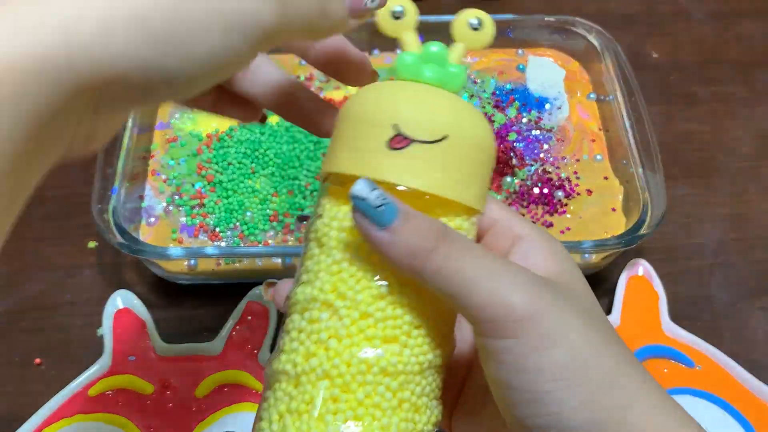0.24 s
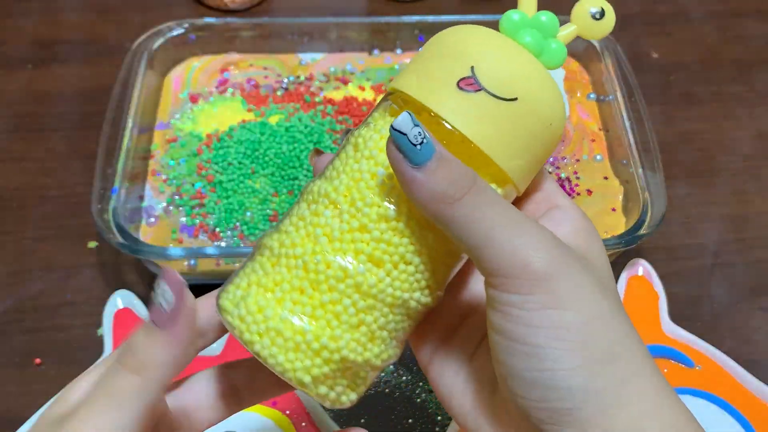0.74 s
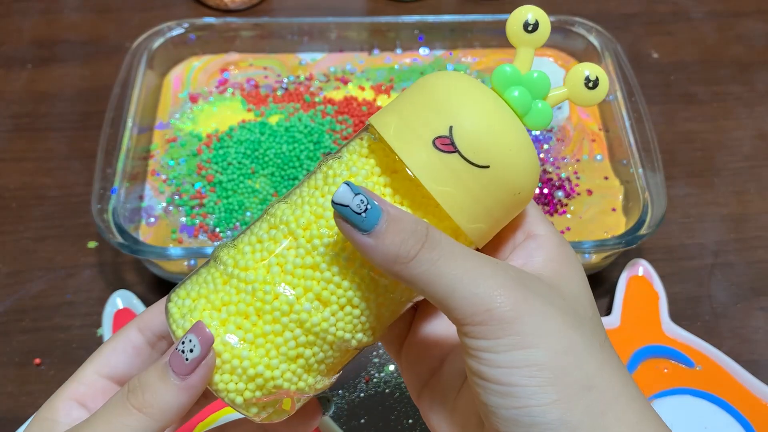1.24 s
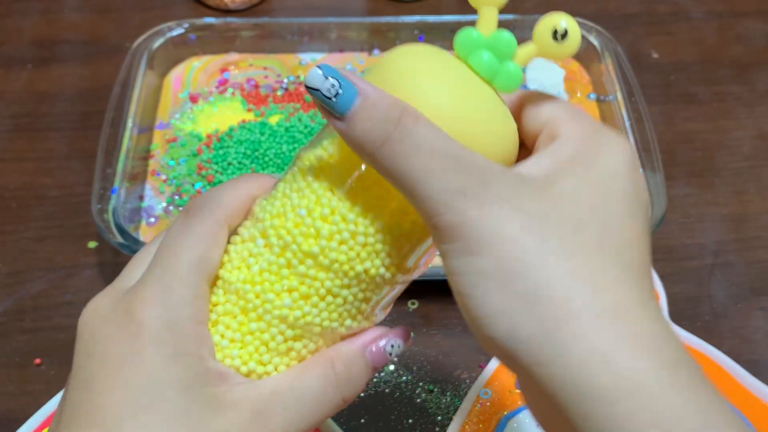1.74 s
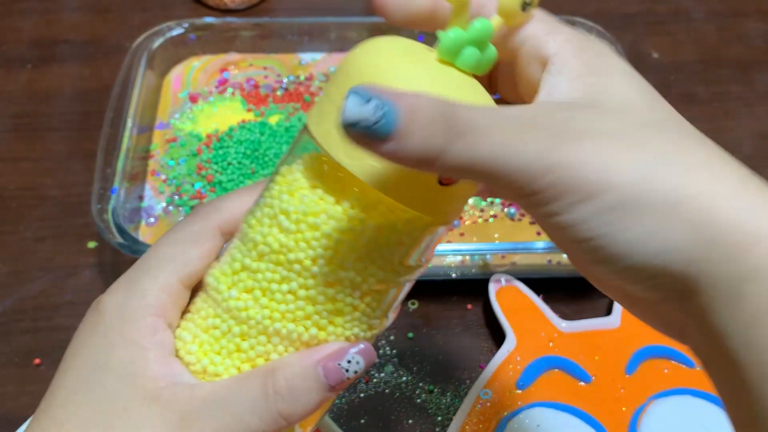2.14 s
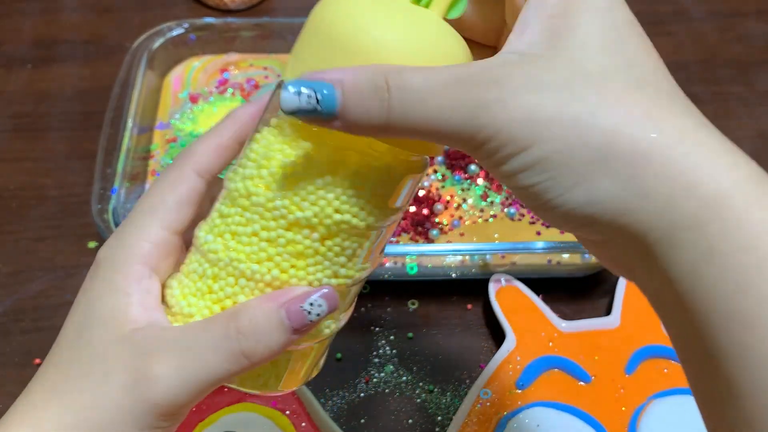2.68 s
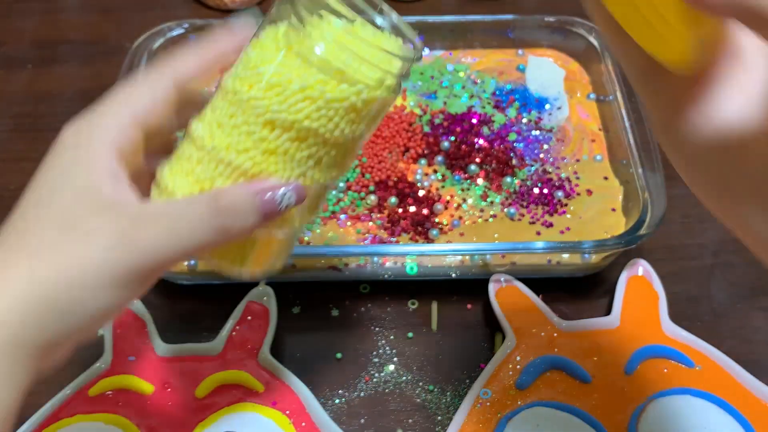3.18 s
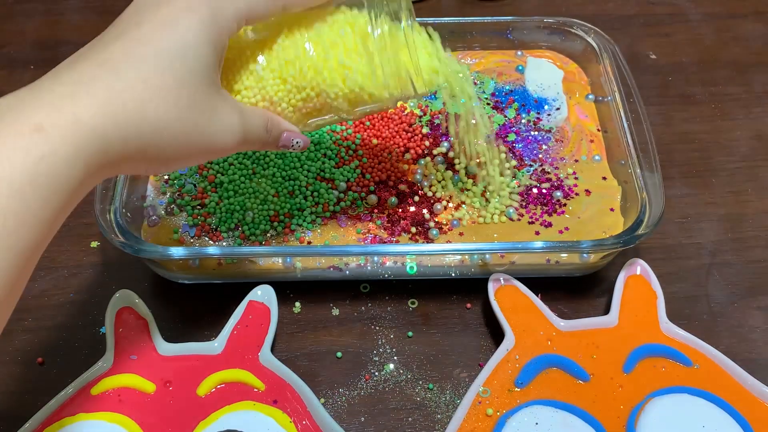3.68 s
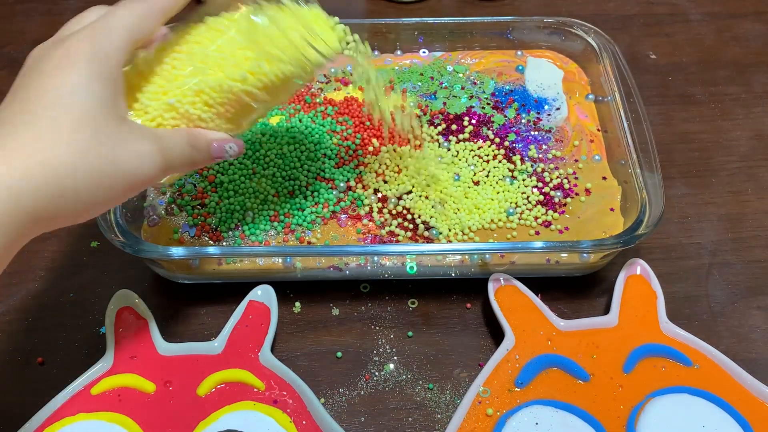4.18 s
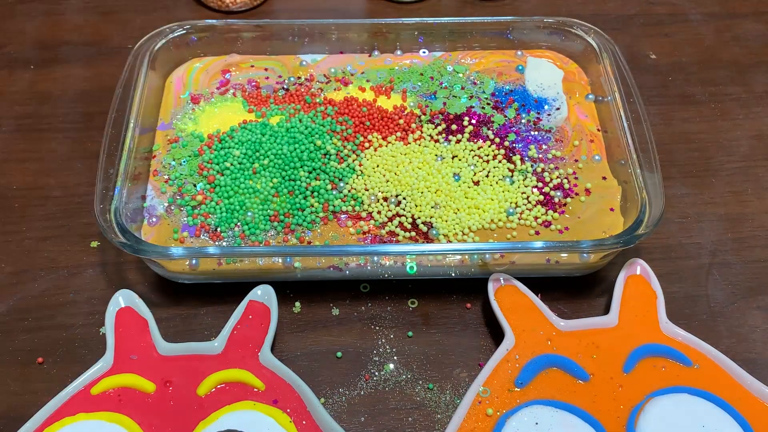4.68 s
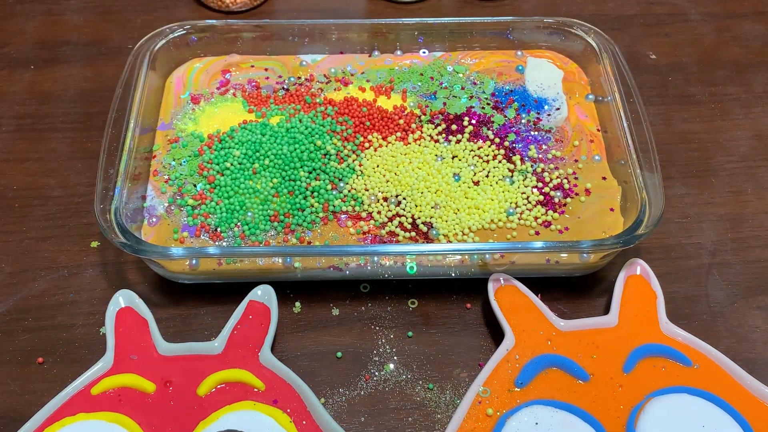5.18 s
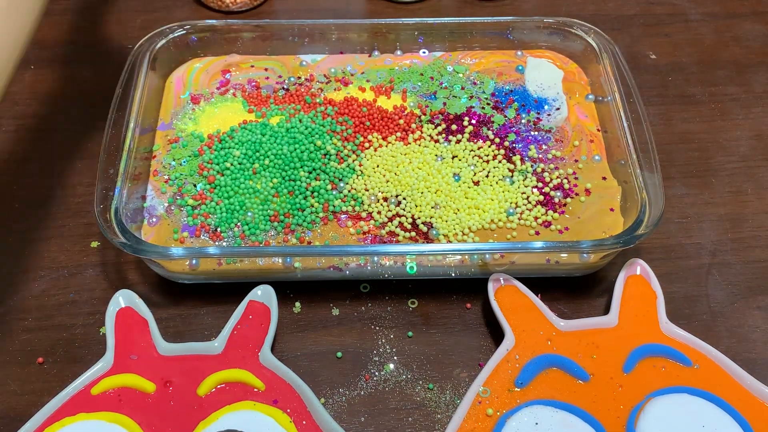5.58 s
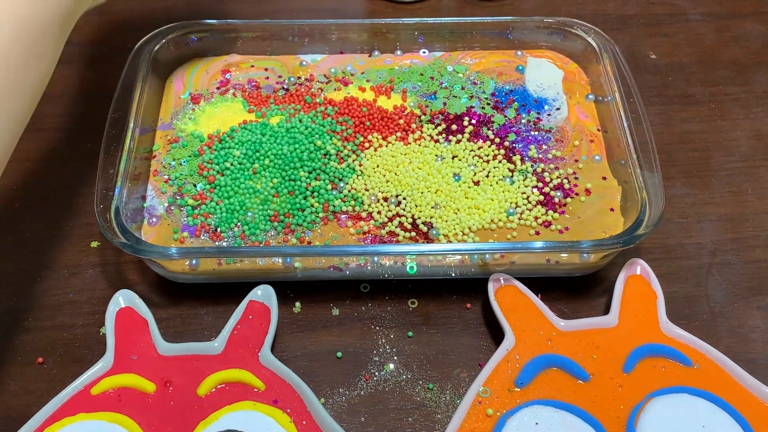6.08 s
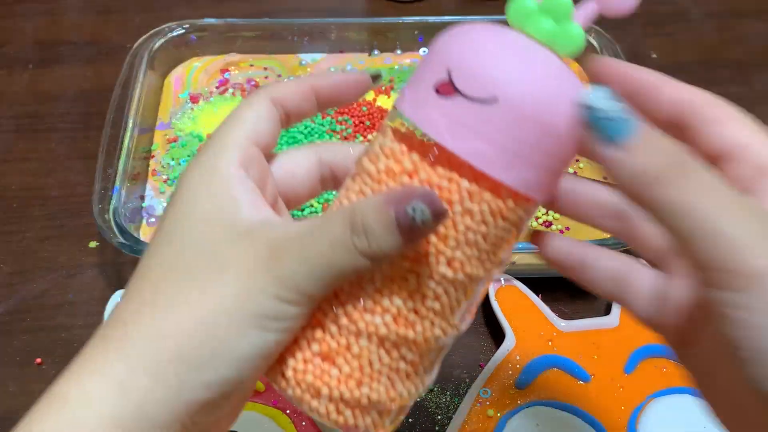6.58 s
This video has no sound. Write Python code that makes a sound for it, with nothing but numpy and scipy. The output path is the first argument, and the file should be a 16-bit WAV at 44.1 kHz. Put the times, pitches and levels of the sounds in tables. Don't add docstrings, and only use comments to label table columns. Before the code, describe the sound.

A thin plastic jar of foam beads is brushed and twisted open with squeaky clicks and a pop, beads patter out, a lid clatters on a table.

```python
import sys
import numpy as np
from scipy import signal
from scipy.fft import rfft, irfft, next_fast_len
from scipy.io import wavfile
from scipy.ndimage import uniform_filter1d, map_coordinates

SR = 44100
rng = np.random.default_rng(int(sys.argv[2]) if len(sys.argv) > 2 else 0)


def undo_db(level):
    steps = np.asarray(level, float) / 20
    return 10 ** steps


def unload_wav(signal):
    wavfile.write(
        sys.argv[1],
        SR,
        np.round(np.clip(np.atleast_2d(signal).T, -1, 1) * 32767).astype(np.int16),
    )


N = 301203

# freq_hz, level_db_per_hz
HUM_SPECTRUM = [(15, -84), (25, -35), (43, -14), (70, -13), (108, 0.5), (150, -18.5), (330, -22),
                (483, -27), (651, -29), (902, -33.5), (2150, -36), (4240, -38.5), (9330, -43), (15200, -36),
                (16500, -59)]
# freq_hz, likeness
DIFFUSE_LIKENESS = [(60, 0.94), (130, 0.95), (290, 0.86), (640, 0.29), (1410, 0.14), (3100, -0.24),
                    (6820, 0.0066), (15000, 0.11)]
# freq_hz, t60_s
ROOM_DECAY = [(150, 0.34), (500, 0.62), (2000, 0.68), (6000, 0.56), (14000, 0.6)]

# peak_s, rustle_db, rise_s, fall_s, brightness_db
BRUSHES = [(0.012, -60.5, 0.34, 0.15, -2), (0.318, -66.5, 0.012, 0.16, 7), (1.72, -65.5, 0.076, 0.18, 1.5),
           (1.81, -59, 0.0078, 0.043, -14), (1.979, -59.5, 0.057, 0.092, 3.5),
           (2.413, -56, 0.015, 0.0064, 19), (4.828, -71.5, 0.027, 0.1, 4.5),
           (4.918, -63.5, 0.063, 0.26, -14), (5.7, -59, 0.03, 0.35, -4), (5.76, -67, 0.096, 0.11, -8),
           (5.83, -67, 0.14, 0.044, -19), (6.062, -65, 0.016, 0.23, 6.5), (6.43, -68.5, 0.12, 0.19, -10),
           (6.55, -69, 0.21, 0.075, -1), (6.74, -74.5, 0.18, 0.41, -2.5)]
# freq_hz, level_db_per_hz
SKIN_SPECTRUM = [(1290, -14.5), (2200, -3.5), (3600, -3), (4280, -3.5), (6500, -6), (9700, -1.5),
                 (11200, 4), (14700, -17), (16200, -1.5), (18000, -56.5)]
# freq_hz, width_hz, level_db
SQUEAK_MODE = [(4340, 750, -1)]
# freq_hz, level_db_per_hz
SCUFF_SPECTRUM = [(320, -40), (550, -10), (860, -10), (1010, -3.5), (1120, -9), (1760, -6.5), (2350, -9.5),
                  (2900, -29), (6600, -120)]
# start_s, peak_db, start_hz, length_s
SWIPES = [(0.19, -35.5, 74, 0.024), (0.203, -31.5, 130, 0.028), (0.231, -37, 119, 0.032),
          (0.264, -38, 120, 0.055), (1.745, -49, 166, .04), (2.012, -52, 121, .035),
          (2.313, -57, 98.2, 0.028), (2.487, -42, 116, 0.029), (2.93, -59, 130, .045),
          (3.632, -46.5, 81, .025), (3.649, -36.5, 140.3, 0.034), (3.674, -30.5, 148, 0.036),
          (3.715, -34, 115.3, 0.02), (3.893, -37, 149, 0.046), (3.936, -37, 130, 0.018),
          (3.955, -33.5, 130, 0.042), (3.998, -40, 110, 0.041), (4.054, -32.5, 153, 0.059),
          (4.154, -39, 104, 0.018), (6.128, -44.5, 245, 0.049), (6.205, -48, 130, 0.026),
          (6.63, -49, 120, .013), (6.647, -44.5, 546, 0.0071), (6.648, -23, 234, 0.059)]

# start_s, click_peak_db, wall_rel_db, left_right_db, burst_ms
TOUCHES = [(0.3166, -54.5, -9, 12.5, 1.5), (1.8028, -31.5, -7, 4.5, 1.4), (2.045, -46, -4.5, 2, 2.8),
           (3.495, -46, -16, 2.5, 0.7), (3.538, -52, -32, 4, 1.1), (4.893, -47, -7, 4, 2),
           (5.839, -63, 13, 10, 4.3), (6.0267, -64.5, 0, 0.5, 4), (6.09, -53, 6, -0.5, 9.6),
           (6.109, -48, 10, 3, 11.5), (6.1253, -51, -28, -5, 5), (6.136, -47, 0, 0, 3.3)]
# freq_hz, level_db_per_hz
CLICK_SPECTRUM = [(1500, -22.5), (2300, -23), (3200, -5.5), (4300, 2.5), (5600, -1.5), (7500, -4.5),
                  (9700, -8), (11300, -8), (14500, -12.5), (16500, -15), (18000, -61.5)]
# freq_hz, width_hz, level_db
JAR_MODES = [(130, 114, -4), (223, 115, 1.5), (378, 133, 1), (511, 159, -2)]
# freq_hz, width_hz, level_db
WALL_MODES = [(950, 2570, -7.5), (1357, 218, 7), (2256, 154, 1)]
# start_s, peak_db, left_right_db
SNAPS = [(1.8021, -31.5, -1), (2.188, -27.5, 3), (2.387, -37, -9), (2.496, -18.5, -2), (2.8644, -41, -4),
         (2.9153, -55, -1.5), (3.213, -21, 7), (3.496, -52, -3), (3.657, -30, 3), (3.821, -33.5, -4),
         (3.9853, -32, 4), (4.137, -35, -4), (4.29, -34, -4), (4.892, -55, -2), (5.092, -21, -3),
         (5.3322, -15, -2.5), (6.124, -38.5, -5), (6.1364, -43, -3)]
# start_s, peak_db, pitch_hz, t60_s, left_right_db
TAPS = [(1.802, -63, 930, 0.0089, -1), (2.865, -35, 1430, .015, 7), (2.907, -30, 1100, .015, 0),
        (2.917, -32, 1950, 0.017, 14), (3.2135, -24.5, 1224, 0.025, 13), (3.2135, -32, 4900, 0.028, 23),
        (3.656, -38.5, 428, 0.058, -8), (3.821, -39.5, 1610, 0.029, 2), (3.985, -46, 530, 0.055, -2),
        (3.985, -39.5, 1635, 0.03, 0), (4.138, -43, 540, 0.056, -2), (4.288, -49, 526, 0.071, -5),
        (4.288, -55, 2300, 0.038, 5), (2.866, -29, 250, 0.081, -2.5), (4.892, -58.5, 970, 0.016, 2),
        (5.054, -26, 903, 0.05, -18), (5.092, -20, 3460, 0.027, -2), (5.11, -25, 896, 0.079, -11),
        (5.112, -22.5, 3390, 0.04, 11), (5.121, -23, 796, 0.041, -20), (5.127, -35, 1710, 0.018, 2),
        (5.199, -29, 984, 0.082, -13), (5.21, -25, 1100, 0.043, -7), (5.333, -23.5, 698, 0.063, -11),
        (5.346, -21, 750, 0.064, -14), (5.347, -14, 2860, 0.023, 2), (5.699, -53, 2368, .02, 1),
        (5.81, -60, 2630, 0.025, 3), (5.839, -52, 2110, 0.023, 9), (6.027, -52.5, 2730, 0.014, 14),
        (2.918, -28, 286, 0.035, -2), (6.089, -40, 2180, 0.016, 12), (6.107, -39.5, 1280, 0.1, 3),
        (6.118, -42, 2060, 0.065, -4), (6.125, -66, 4150, 0.091, 2), (6.136, -40.5, 598, 0.064, 5),
        (6.17, -50.5, 1010, 0.057, 4), (3.177, -26.5, 390, 0.073, -1), (2.939, -26, 202, 0.048, -1)]
# start_s, peak_db, pitch_hz, t60_s, left_right_db
MORE_TAPS = [(2.355, -46, 229, .05, 0), (2.488, -47, 200, .04, -1), (2.527, -32, 500, 0.032, -2),
             (2.544, -28, 427, 0.053, 0), (2.554, -33, 242, 0.075, -2), (2.57, -43, 300, .03, 0),
             (2.587, -41, 328, 0.036, 0), (2.598, -45, 300, .03, 0), (2.711, -62, 300, 0.031, 0),
             (2.831, -35, 216, 0.061, -2), (2.9497, -19.5, 335, .025, -1), (3.066, -29, 307, 0.043, 0),
             (1.8024, -29, 4330, 0.014, -3), (1.803, -37, 5660, .012, -5), (2.188, -39, 318, .04, 0),
             (2.386, -24, 4000, 0.011, 0), (3.155, -29, 347, 0.09, -3.5), (3.1797, -17.5, 376, 0.038, -1),
             (3.186, -33, 130, 0.072, 4), (3.214, -25, 610, .05, 6), (5.055, -25, 322, 0.058, -12),
             (5.055, -27, 1790, 0.045, 2), (5.201, -21, 1805, 0.05, 0), (5.335, -20, 800, 0.037, -8.5),
             (6.128, -55, 207, 0.032, 0)]

# peak_s, rustle_db, rise_s, fall_s, grip_boom_rel_db
TWISTS = [(2.14, -50, 0.014, 0.48, -52), (2.199, -52, 0.017, 0.079, -3.5), (2.3, -65.5, 0.12, 0.14, 6),
          (2.387, -46, 0.1, 0.048, 3.5), (2.502, -48.5, 0.021, 0.29, 5.5), (2.6, -57, 0.19, 0.045, 6),
          (2.7, -58, 0.12, 0.055, -6), (2.828, -51.5, 0.014, 0.053, 7.5), (2.864, -43, 0.0022, 0.034, -10),
          (2.92, -43, 0.037, 0.045, 1.5), (2.948, -52.5, 0.037, 0.026, 13.5),
          (2.969, -49.5, 0.054, 0.19, 4.5), (3.165, -54.5, 0.35, 0.038, 7.5)]
# start_s, click_peak_db, body_rel_db, wall_rel_db, burst_ms
CATCHES = [(2.1891, -30, -7.5, -8, 9.7), (2.3531, -46, 9, -12, 4), (2.386, -20.5, -6, -14, 2.1),
           (2.4964, -21.5, -0.5, -10.5, 3.3), (2.5468, -47, 12.5, 10, 8.6), (2.5843, -36.5, 3, -3.5, 5),
           (2.708, -50.5, 5, -2, 25), (2.832, -39, 3, -2, 5.1), (2.8656, -19.5, -16.5, -15, 0.72),
           (2.916, -25, -4, -13, 4.2), (2.948, -46, 19.5, -15, 3.2), (3.069, -46.5, 12.5, -34.5, 3.2),
           (3.171, -46, 18, 7, 6.4), (3.178, -25, 7, -23, 3.9), (3.1867, -22.5, -5.5, -4.5, 2.8),
           (3.1975, -31, -18, -2.5, 6.6), (3.2135, -16, -18, -7, 2.2)]
# peak_s, rustle_db, rise_s, fall_s, grip_boom_rel_db
PULL = [
    (3.178, -27, 0.005, 0.037, -5),
    (3.201, -32, 0.0089, 0.0065, -15),
    (3.225, -50.5, 0.012, 0.17, 1.5),
    (3.599, -74.5, 0.12, 0.39, 13.5),
]
# freq_hz, width_hz, level_db, t60_s
MOUTH_MODES = [
    (393, 35, -36.5, 0.4),
    (3880, 220, -43, 0.48),
    (2620, 1000, -47.5, 0.57),
]

# start_s, knock_db, beads_db, boom_db
SHAKES = [
    (3.6574, -32, -49.5, -52),
    (3.823, -40, -54.5, -63),
    (3.986, -43, -56, -56),
    (4.1386, -40, -54, -49),
    (4.29, -48, -54, -50),
]
# time_s, patter_db
BEAD_FLOW = [(3.655, -48.5), (3.787, -70.5), (3.851, -61), (3.937, -58.5), (4.011, -58), (4.1, -56.5),
             (4.2, -56), (4.357, -57), (4.45, -55.5), (4.55, -52), (4.64, -55), (4.723, -59), (4.811, -49),
             (4.82, -68)]
# freq_hz, level_db_per_hz
BEAD_SPECTRUM = [(1760, -42), (3000, -15), (5950, -8), (9800, -2.5), (11300, 3.5), (13000, -6), (14500, 1),
                 (15900, -5.5), (18000, -57.5)]
# freq_hz, level_db_per_hz
MASS_SPECTRUM = [(470, -2.5), (800, -19), (1580, 0.5), (1960, 1), (2780, 2), (4580, -3), (9140, 3),
                 (12000, -15), (15600, -34), (22000, -120)]
# freq_hz, width_hz, level_db
TILTED_JAR_MODES = [(363, 610, 3), (640, 273, 8)]

# peak_s, scuff_db, rise_s, fall_s
BASE_DRAGS = [
    (4.66, -71, 0.069, 0.17),
    (6.085, -62, 0.045, .04),
    (6.115, -53.5, .02, 0.083),
    (6.175, -60.5, .03, 0.13),
]
# start_s, click_peak_db, shell_rel_db, left_right_db, burst_ms
BOUNCES = [
    (5.0537, -22, -5.5, 0.5, 2.1),
    (5.0595, -28.5, 1.5, 4.5, 1.6),
    (5.0829, -30, -17.5, 0.5, 9.1),
    (5.0921, -16, -19, 1.7, 1.9),
    (5.1102, -20.5, 1, -11, 1.5),
    (5.1265, -25, -5, -10, 2.6),
    (5.1983, -24.5, -4.5, -3.5, 2.6),
    (5.2115, -41, 11.5, -19, 2.8),
    (5.3325, -14, -8, -10.5, 2.4),
    (5.336, -19, -5, -9.5, 2.1),
]
# freq_hz, width_hz, level_db
LID_MODES = [(672, 220, 1), (893, 89, -1), (1027, 100, 2), (1897, 690, -2.5), (3170, 1100, -9)]
# peak_s, scuff_db, rise_s, fall_s
LID_SKIDS = [
    (5.052, -35.5, 0.0094, 0.01),
    (5.22, -35, 0.048, 0.27),
    (5.318, -36, 0.026, 0.017),
]
# start_s, freq_hz, width_hz, level_db, t60_s
LID_SONG = [
    (5.225, 1040, 70, -37.5, .8),
    (5.2, 1900, 190, -38.5, .5),
    (5.11, 880, 110, -33, 0.23),
]
# freq_hz, width_hz, level_db, t60_s
LID_REST_MODES = [(1080, 180, -38.5, 0.71), (680, 150, -35.5, 0.56)]
# peak_s, rustle_db, rise_s, fall_s, grip_boom_rel_db
LIFT = [
    (6.126, -52, 0.043, 0.091, 0.5),
    (6.2, -67.5, 0.076, 0.47, 5),
]


def unit(x):
    return x / np.sqrt(np.mean(x ** 2) + 1e-20)


def unit_rows(x):
    return x / np.linalg.norm(x, axis=1, keepdims=True)


def along(points, hz):
    point_hz, value = np.transpose(points)
    return np.interp(np.log(hz + 1), np.log(point_hz + 1), value)


def curves(rows):
    s, db = np.transpose(rows)
    return np.interp(np.arange(N) / SR, [s[0] - 0.004, *s, s[-1] + 0.012], [-120, *db, -120])


def wobble(rate_hz):
    knots = rng.standard_normal(int(N * rate_hz / SR) + 4)
    return map_coordinates(knots, [np.arange(N) * rate_hz / SR])


def swell(rows):
    s, db, rise, fall = np.transpose(rows)[:, :, None]
    t = np.arange(0, N / SR + 0.002, 0.001)
    strokes_away = np.where(t < s, (s - t) / np.abs(rise), (t - s) / np.abs(fall))
    power = undo_db(2 * db - 40 * strokes_away).sum(0)
    return np.interp(np.arange(N) / SR, t, np.sqrt(power))


def filtered(x, response):
    m = next_fast_len(x.shape[-1] + 2048, True)
    return irfft(rfft(x, m) * response(np.fft.rfftfreq(m, 1 / SR)), m)[..., :x.shape[-1]]


def shaped(points):
    return lambda hz: undo_db(along(points, hz))


def resonant(peaks):
    def response(hz):
        total = 0
        for k, (centre, width, db) in enumerate(peaks):
            damping = 1j * hz * width
            total = total + (-1) ** k * undo_db(db) * damping / (centre * centre - hz * hz + damping)
        return total
    return response


def ports(hz, lag):
    return np.exp(-1j * np.pi * hz * lag / SR * np.array([[1], [-1]]))


def panned(left_right_db):
    return undo_db([[left_right_db / 2], [-left_right_db / 2]])


def stereo(pair, response):
    turn = lambda hz: np.arccos(np.clip(along(DIFFUSE_LIKENESS, hz), -1, 1)) / 2
    mid, side = filtered(pair, lambda hz: response(hz) * [np.cos(turn(hz)), np.sin(turn(hz))])
    return unit(np.array([mid + side, mid - side]))


def alike(pair, shared):
    return pair + shared * pair.sum(0)


def grains(rate_hz, spread_db):
    sizes = undo_db(spread_db * np.minimum(rng.exponential(1, N), 4))
    ticks = (rng.random(N) < rate_hz / SR) * sizes
    wave = rng.standard_normal((3, N))
    return unit(np.convolve(ticks, np.hanning(24), "same") * (wave[:2] + 0.38 * wave[2]))


def patchy(x, depth_db):
    z = signal.stft(x, nperseg=256)[2]
    field = uniform_filter1d(rng.standard_normal(z.shape[1:]), 5, 0)
    field = uniform_filter1d(field, 9, 1)
    return unit(signal.istft(z * undo_db(depth_db * unit(field)), nperseg=256)[1][:, :N])


def background():
    noise = stereo(rng.standard_normal((2, N)), shaped(HUM_SPECTRUM))
    hum = filtered(noise, lambda hz: 1 / (1 + (hz / 300) ** 4))
    return undo_db(-62.5) * (noise + (undo_db(2.2 * wobble(9)) - 1) * hum)


def strokes():
    brush_grip_db, twist_bright_db, pull_bright_db, lift_bright_db = -14.5, 2, -5, -12
    loosen_db_per_s = -8
    wall_by_skin_db, wall_by_grip_db, skid_boom_db = -11.5, -12.5, -13.5
    rows = [(*r, brush_grip_db, bright) for *r, bright in BRUSHES]
    rows += [(*r, lift_bright_db) for r in LIFT]
    rows += [(*r, twist_bright_db + loosen_db_per_s * (r[0] - TWISTS[0][0])) for r in TWISTS]
    rows += [(*r, pull_bright_db) for r in PULL]
    rustle = swell([r[:4] for r in rows])
    fine = swell([(s, db + bright, rise, fall) for s, db, rise, fall, grip, bright in rows])
    boom = swell([(s, db + grip, rise, fall) for s, db, rise, fall, grip, bright in rows])
    skid = swell(LID_SKIDS + BASE_DRAGS)
    wall = undo_db(wall_by_skin_db) * rustle + undo_db(wall_by_grip_db) * boom + skid
    return rustle, fine, boom + undo_db(skid_boom_db) * skid, wall


def rubbing():
    rustle_gain, fine_gain, boom_gain, wall_gain = strokes()
    clumps = undo_db(2.2 * wobble(45))
    slips = clumps * (grains(1700, 1.9) + 1.3 * rng.standard_normal((2, N)))
    skin = shaped(SKIN_SPECTRUM)
    squeak = resonant(SQUEAK_MODE)
    above_7800 = lambda hz: 1 / (1 + (7800 / (hz + 1)) ** 8)
    treble = above_7800
    dull = filtered(slips, lambda hz: skin(hz) * ports(hz, -6.0) * (1 - treble(hz)) * (1 + squeak(hz)))
    fine = filtered(alike(slips, 2), lambda hz: skin(hz) * ports(hz, -6.5) * treble(hz))
    boom = stereo(undo_db(1.2 * wobble(30)) * grains(1500, 1.5), resonant(JAR_MODES))
    wall = stereo(clumps * grains(2500, 1.8), shaped(SCUFF_SPECTRUM))
    out = rustle_gain * patchy(unit(dull), depth_db=2.5)
    out = out + fine_gain * patchy(unit(fine), depth_db=3.5)
    return out + boom_gain * boom + wall_gain * wall


def draught():
    rest_hz, slowing_s, round_s = 34, 0.019, 0.035
    air = np.zeros(N)
    for s, db, start_hz, length_s in SWIPES:
        u = np.linspace(0, 1, round(length_s * SR))
        glide = (start_hz - rest_hz) * slowing_s * (1 - np.exp(-length_s * u / slowing_s))
        turns = rest_hz * length_s * u + glide
        envelope = np.abs(np.sin(np.pi * u ** 0.53)) ** (length_s / round_s)
        air[round(s * SR):][:len(u)] -= undo_db(db) * envelope * np.sin(2 * np.pi * turns)
    skew = np.exp(-0.3j * np.array([[1], [-1]]))
    return filtered(air, lambda hz: skew / (1 + (hz / 650) ** 6))


def contacts():
    touch_body_db = -23
    shake_body_db, shake_wall_db, shake_ms = -9, -2, 1.7
    return ([(s, db, touch_body_db, wall, pan, ms) for s, db, wall, pan, ms in TOUCHES]
            + [(s, db, body, wall, 0, ms) for s, db, body, wall, ms in CATCHES]
            + [(s, db, shake_body_db, shake_wall_db, 0, shake_ms) for s, db, *_ in SHAKES])


def hits(rows, low, shell, low_db, shell_db, hardness):
    out, t = np.zeros((3, N + SR)), np.arange(3000) / SR
    blow = 1.0 * (np.arange(len(t)) == 16)
    sharpness = hardness * np.array([[4.5], [12], [7]])
    colour = lambda hz: np.array([shaped(CLICK_SPECTRUM)(hz), resonant(low)(hz), resonant(shell)(hz)])
    smooth = unit_rows(filtered(blow, colour))
    for s, db, low_rel, shell_rel, pan, ms in rows:
        envelope = np.exp(-t * 1000 / max(ms, 0.5)) * (1 - np.exp(-t / 0.00052))
        burst = rng.standard_normal((3, len(t))) * envelope
        direct = filtered(burst + sharpness * blow, colour)
        peaks = undo_db([[db], [db + low_rel + low_db], [db + shell_rel + shell_db]])
        direct = direct / np.abs(direct).max(1, keepdims=True) * peaks
        pair = panned(pan) * filtered(direct.sum(0), lambda hz: ports(hz, -1.2 * pan - 3))
        send = np.linalg.norm(direct, axis=1) @ smooth
        out[:, round(s * SR) - 16:][:, :len(t)] += np.vstack([pair, send])
    return out[:2, :N], out[2, :N]


def snaps():
    decay_ms, cut_hz = 1, 4000
    out, t = np.zeros((2, N + SR)), np.arange(400) / SR
    for s, db, pan in SNAPS:
        envelope = np.exp(-t * 1000 / decay_ms) * (1 - np.exp(-t / 0.00018))
        crack = rng.standard_normal(len(t)) * envelope
        out[:, round(s * SR):][:, :len(t)] += undo_db(db - 2) * panned(pan) * crack / np.abs(crack).max()
    return filtered(out[:, :N], lambda hz: ports(hz, -4.5) * (1j * hz / (cut_hz + 1j * hz)) ** 2 * 2)


def taps():
    twin_ratio, lag_samples = 1 + 0.055, 0.5
    send, pair = np.zeros(N + SR), np.zeros((2, N + SR))
    t = np.arange(SR // 8) / SR
    for s, db, hz, t60, pan in TAPS + MORE_TAPS:
        modes = np.sin(2 * np.pi * hz * t) + 0.2 * np.sin(2 * np.pi * hz * twin_ratio * t)
        ring = 0.5 * undo_db(db - 60 * t / abs(t60)) * (1 - np.exp(-t / 0.001)) * modes
        send[round(s * SR):][:len(t)] += ring
        pair[:, round(s * SR):][:, :len(t)] += panned(pan) * ring
    return filtered(pair[:, :N], lambda hz: ports(hz, lag_samples)), send[:N]


def lingering_rings():
    pop_s, lid_clear_s, settle_s = 3.18, 0.026, 5.345
    out, t = np.zeros((2, N)), np.arange(SR // 2) / SR
    rows = [(pop_s + lid_clear_s * (r[0] > 1000), *r) for r in MOUTH_MODES]
    rows += [(settle_s, *r) for r in LID_REST_MODES]
    for s, hz, width, db, t60 in rows + LID_SONG:
        mode = resonant([(hz, width, 0)])
        narrow = stereo(rng.standard_normal((2, len(t))), lambda f: mode(f) ** 2)
        out[:, round(s * SR):][:, :len(t)] += undo_db(db - 60 * t / t60) * narrow
    return out


def pouring():
    lag_s, rise_s, slide_fall_s, boom_fall_s = 0.0033, 0.016, 0.17, 0.12
    surge_db, surge_lag_s, surge_rise_s, surge_fall_s = 8.5, 0.035, 0.068, 0.12
    creep_db, creep_boom_db = -20, -33.5
    flow = undo_db(curves(BEAD_FLOW) + 1.13)
    slide = swell([(s + lag_s, db, rise_s, slide_fall_s) for s, _, db, _ in SHAKES])
    slump = swell([(s + lag_s, db, rise_s, boom_fall_s) for s, _, _, db in SHAKES])
    surge = swell([(s + surge_lag_s, surge_db, surge_rise_s, surge_fall_s) for s, *_ in SHAKES[1:]])
    patter = undo_db(1.1 * wobble(37)) * (grains(3000, 1.7) + 0.6 * rng.standard_normal((2, N)))
    patter = unit(filtered(alike(patter, 0.48), lambda hz: shaped(BEAD_SPECTRUM)(hz) * ports(hz, -1.5)))
    mass = stereo(grains(2800, 0.84), shaped(MASS_SPECTRUM))
    boom = stereo(grains(1000, 0.29), resonant(TILTED_JAR_MODES))
    out = flow * (1 + surge) * patchy(patter, depth_db=2.0)
    out = out + (slide + undo_db(creep_db) * flow) * mass
    return out + (slump + undo_db(creep_boom_db) * flow) * boom


def lid_drop():
    cut_hz, body_db = 170, -7
    rows = [(s, db, body_db, *r) for s, db, *r in BOUNCES]
    direct, send = hits(rows, JAR_MODES, LID_MODES, low_db=-3.0, shell_db=6.0, hardness=0.51)
    no_bass = lambda hz: (1j * hz / (cut_hz + 1j * hz)) ** 2
    return filtered(direct, no_bass), filtered(send, no_bass)


def room(x):
    out, step, size = np.zeros((2, N + 3 * SR)), SR // 3, 28000
    for start in range(0, N, step):
        hz, t, z = signal.stft(rng.standard_normal((2, size)), SR, nperseg=256)
        stretch = x[None, start:start + step]
        if stretch.any():
            decay = undo_db(-60 * t / along(ROOM_DECAY, hz)[:, None])
            tail = stereo(signal.istft(z * decay, SR, nperseg=256)[1], np.ones_like)
            wet = signal.fftconvolve(stretch, tail, axes=1) / np.sqrt(SR)
            out[:, start + 250:][:, :wet.shape[1]] += wet
    return out[:, :N]


def scene():
    near, near_send = hits(contacts(), JAR_MODES, WALL_MODES, low_db=-2.5, shell_db=-2.5, hardness=0.64)
    knocks, knock_send = taps()
    lid, lid_send = lid_drop()
    echo = room(undo_db(-10.0) * near_send + undo_db(6.0) * lid_send + undo_db(-7.5) * knock_send)
    handling = rubbing() + near + snaps() + knocks
    return background() + handling + draught() + lingering_rings() + pouring() + lid + echo


def hollowed(mix):
    gap_low_hz, gap_high_hz, top_hz = 12430, 13450, 15780
    hole_hz, hole_spread_hz, hole_width_hz = 2850, 330, 170
    hz, t, z = signal.stft(mix, SR, nperseg=1024)
    band_power = lambda band: np.sum(np.abs(z[:, band]) ** 2, axis=(0, 1))
    noise = lambda frames: uniform_filter1d(rng.standard_normal((2, len(t))), frames)
    pitch = hz[:, None]
    power = band_power(hz > 3000)
    usual = np.median(power)
    attack = power > undo_db(24) * np.roll(power, 2)

    edge = 220 * noise(3)
    airy = uniform_filter1d(band_power(hz > 13500) / power, 3)
    widen = np.where((airy > 0.1) & (power > 4 * usual), -270, 40)
    fading = (power < np.roll(power, 3)) & (power > 60 * usual)
    top = top_hz - fading * (airy < 0.06) * (600 + 4 * np.abs(edge[0]))
    gap = (pitch > gap_low_hz + edge[0] - widen) & (pitch < gap_high_hz + edge[1] + widen)
    empty = gap | (pitch > top)

    middle = band_power((hz > 2200) & (hz < 3500))
    valley = (uniform_filter1d(middle / power, 9) < 0.09) & (power > 2 * np.quantile(power, 0.3))
    chance = noise(7)
    held = np.arange(len(t)) // 6 * 6
    spot = hole_hz + hole_spread_hz * np.round(unit(chance[0])[held])
    empty |= (np.abs(pitch - spot) < hole_width_hz) & (unit(chance[1]) > -0.1) & valley

    gain = np.where(empty & ~attack, undo_db(-60), 1) * (pitch < 16600)
    return signal.istft(z * gain, SR, nperseg=1024)[1][:, :N]


def roll_off(x):
    return signal.sosfilt(signal.butter(12, 16620, fs=SR, output="sos"), x)


def record(dry):
    mix = hollowed(dry)
    return roll_off(mix)


dry = scene()
out = record(dry)
unload_wav(out)
```